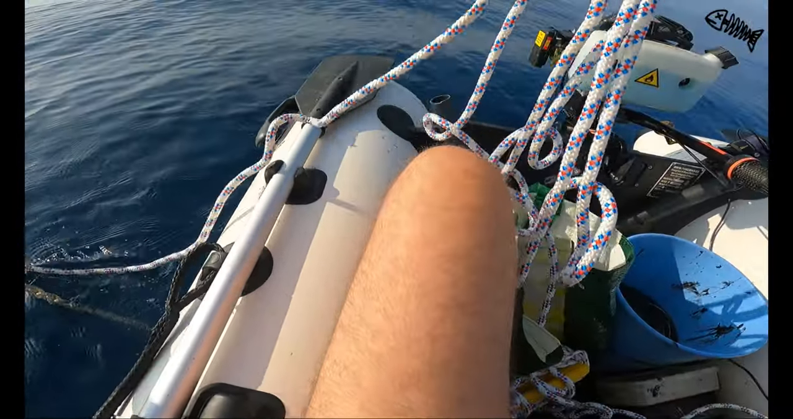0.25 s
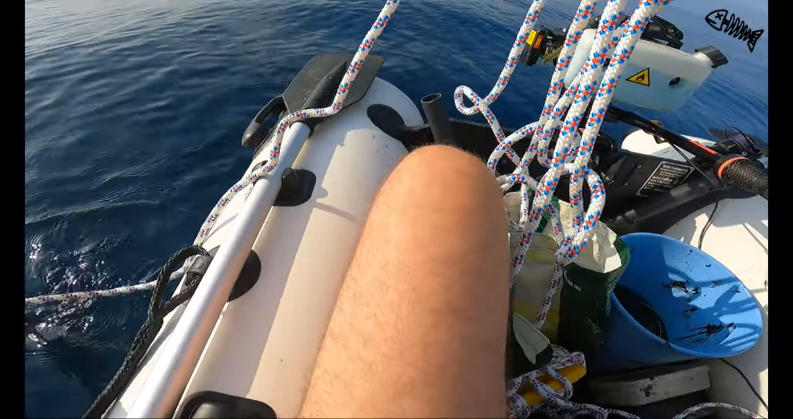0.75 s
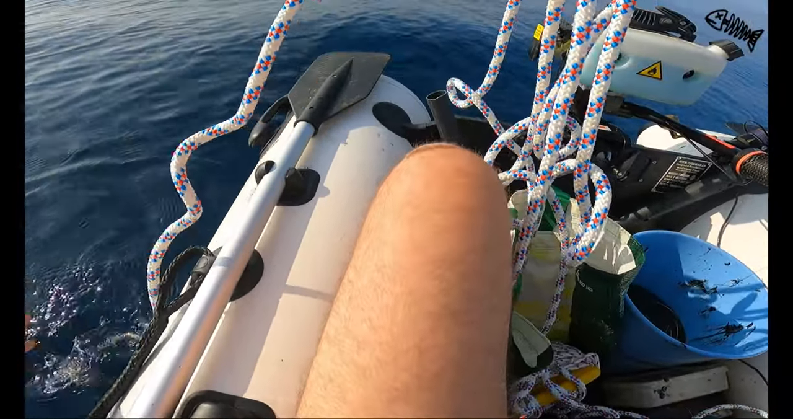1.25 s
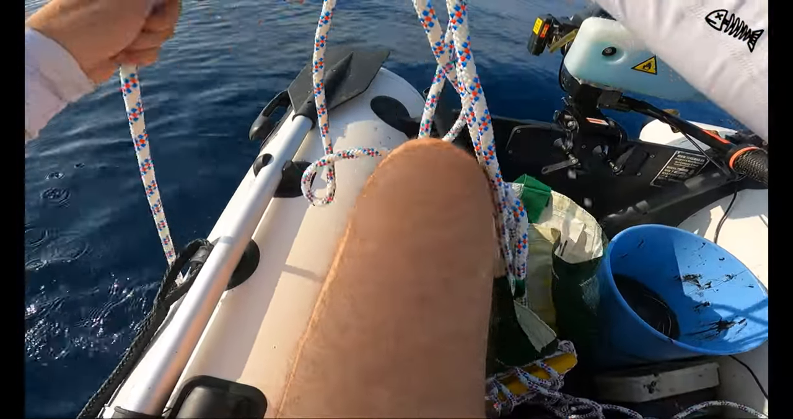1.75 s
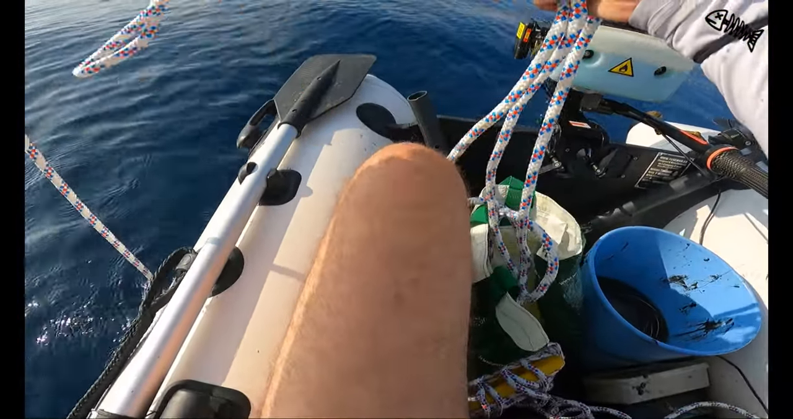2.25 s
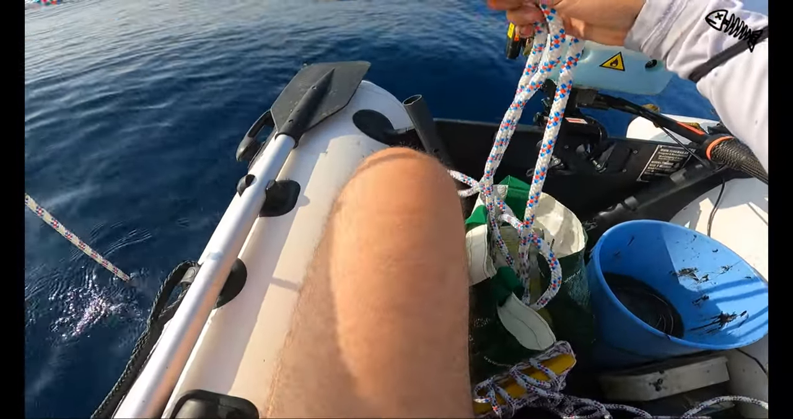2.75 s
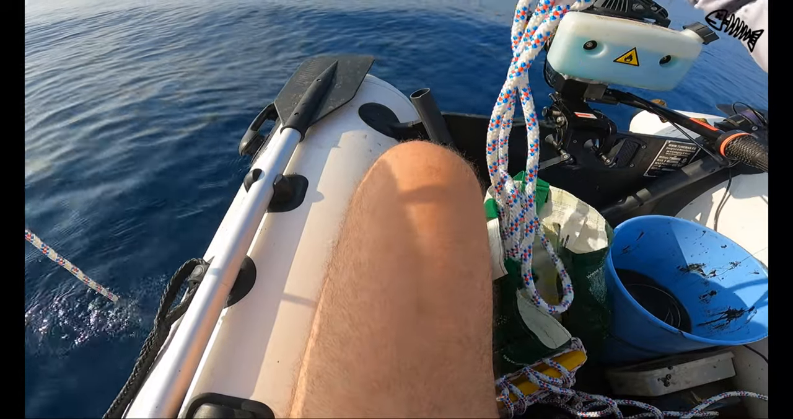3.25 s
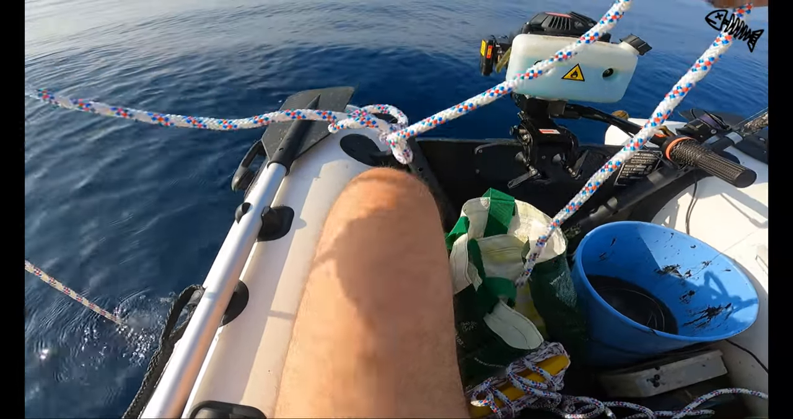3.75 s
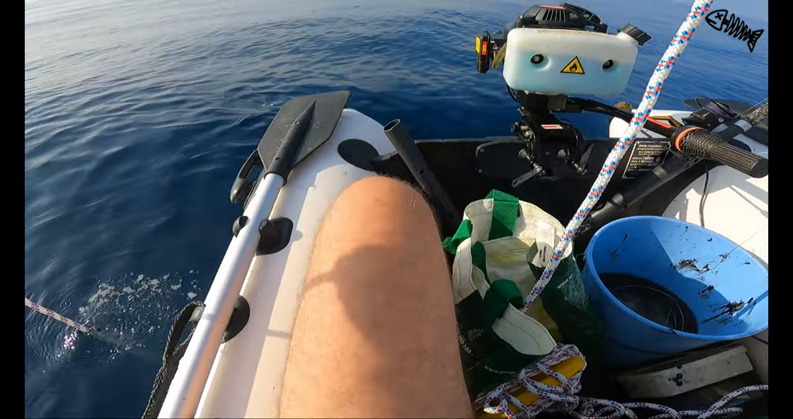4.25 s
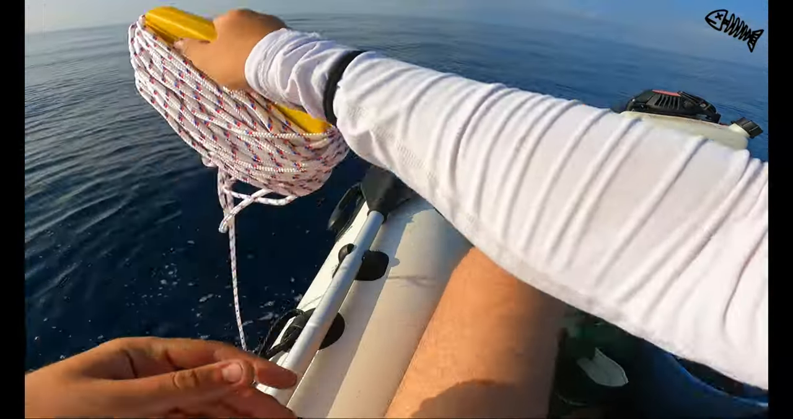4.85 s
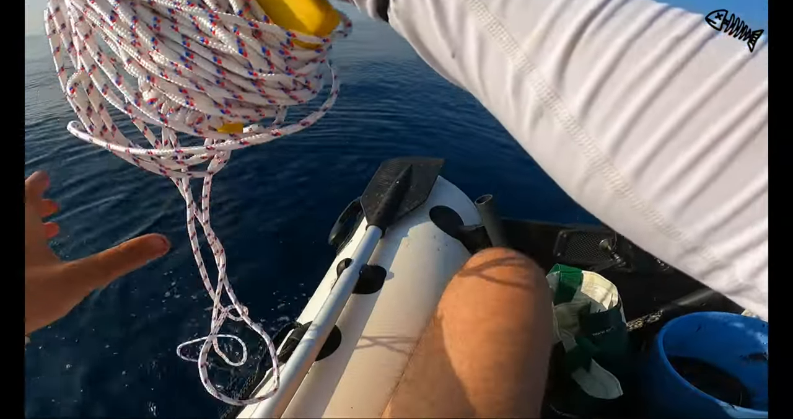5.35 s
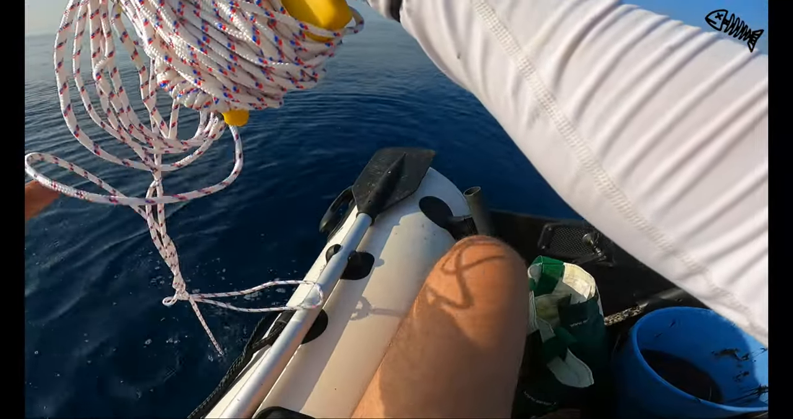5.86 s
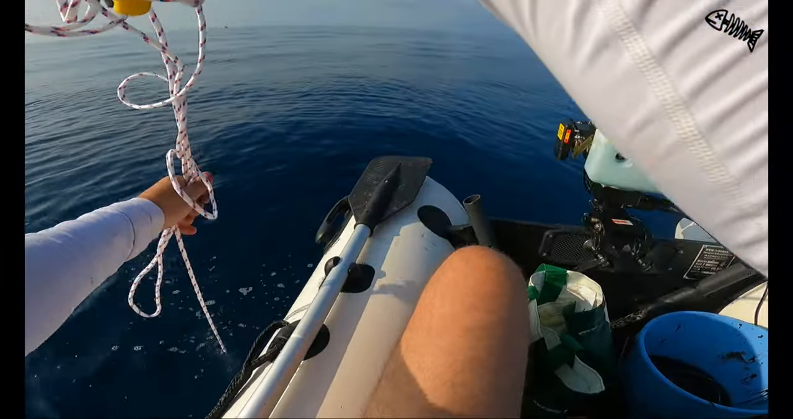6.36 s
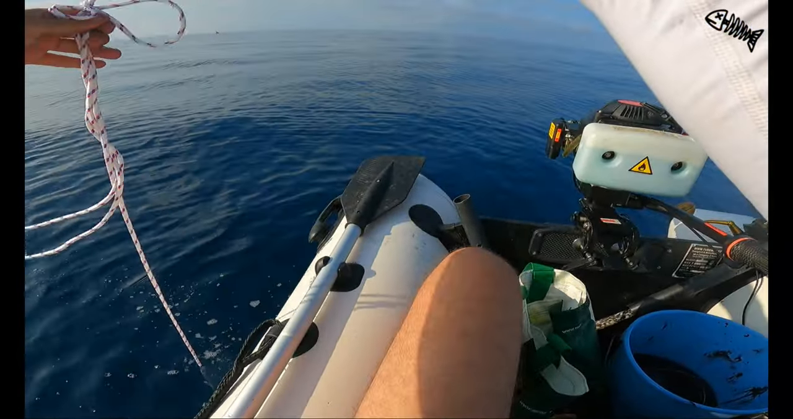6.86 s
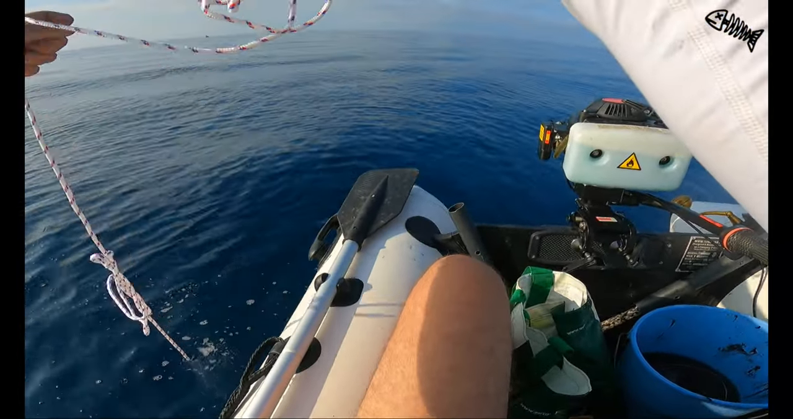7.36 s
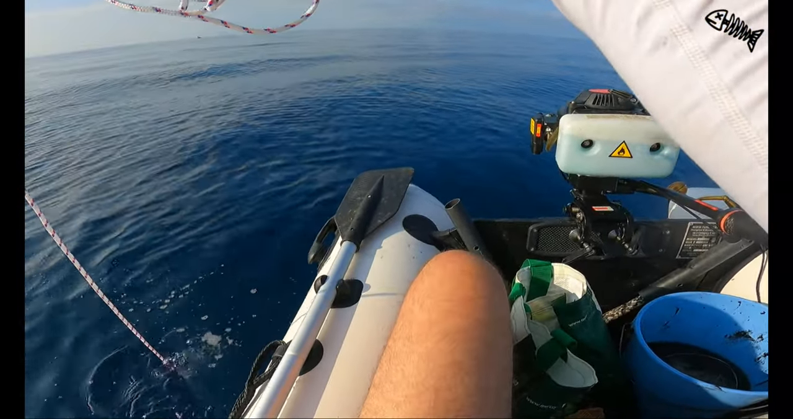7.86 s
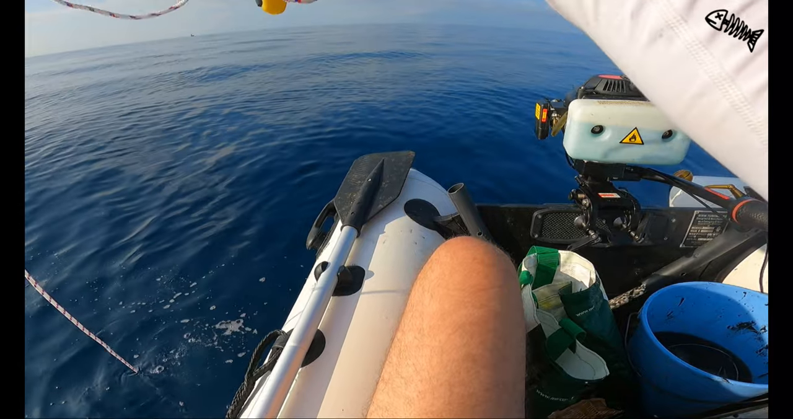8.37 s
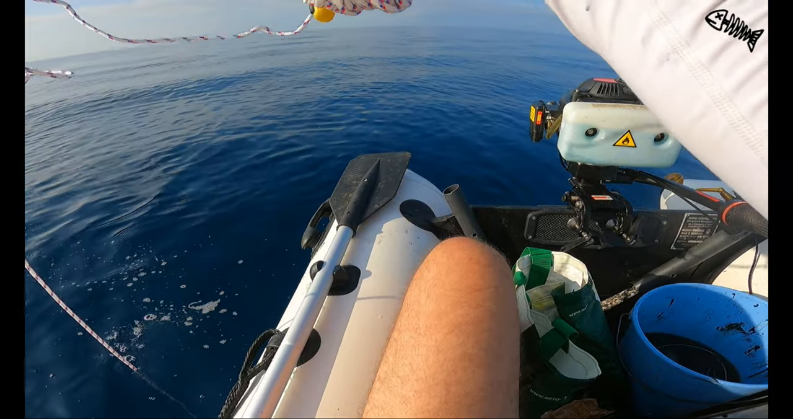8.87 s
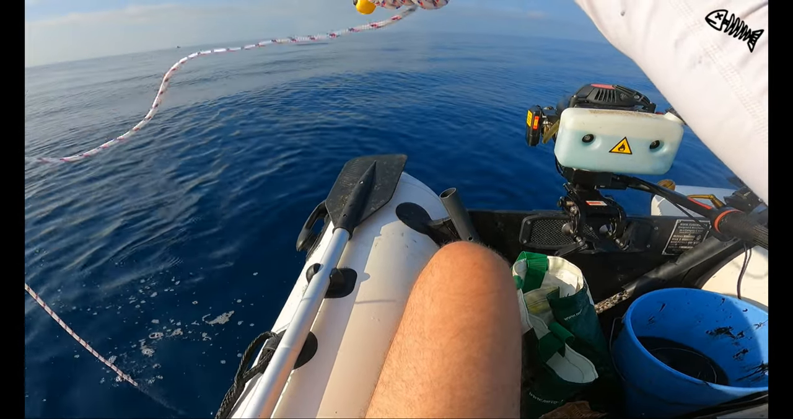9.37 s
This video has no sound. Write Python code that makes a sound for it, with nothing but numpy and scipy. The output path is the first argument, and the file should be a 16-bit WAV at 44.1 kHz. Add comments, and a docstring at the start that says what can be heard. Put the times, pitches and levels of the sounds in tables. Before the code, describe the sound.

Close by, a rope is paid out from a small inflatable boat. It plops, drips and splashes into the water, then rubs the rubber side with a short, jerky groan. The braid rasps through hands and scuffs against the boat. Two more clusters of small splashes follow while the sliding turns to a thinner hiss. Calm water washes faintly along the hull, and light gusts thump on the microphone in the open air.

```python
"""Calm water washes along a small inflatable boat in a light wind as an anchor rope is paid out.
Its loops scuff the side and slap the sea: impacts splat, trapped air rings in plops, and drips and
spray tick and leave small bubbles. Friction makes the braid hiss and crackle in the hands; pulled taut,
it sticks and slips on the air tube with a groan. Gusts puff on the microphone."""
import sys
import numpy as np
from scipy import signal
from scipy.fft import rfft, irfft, next_fast_len
from scipy.io import wavfile
from scipy.ndimage import uniform_filter1d, map_coordinates

SR = 44100
rng = np.random.default_rng(int(sys.argv[2]) if len(sys.argv) > 2 else 0)


def inscribe(sig):
    """Save sig as 16-bit PCM at rate SR to the path in sys.argv[1].

    A 1-D sig is mono; a 2-D sig holds one channel per row.
    Samples are clipped to [-1, 1] before scaling.
    """
    pcm = np.round(np.clip(np.atleast_2d(sig).T, -1, 1) * 32767)
    wavfile.write(sys.argv[1], SR, pcm.astype(np.int16))


N = 423801


def amp(db):
    """Amplitude ratio of a level in decibels."""
    return 10 ** (np.asarray(db) / 20)


def unit(x):
    """Normalisation to rms 1."""
    return x / np.sqrt(np.mean(x ** 2) + 1e-20)


def along(points, hz):
    """Interpolation of (frequency_hz, value) points on a logarithmic frequency axis."""
    frequencies, values = np.transpose(points)
    return np.interp(np.log(hz + 1), np.log(frequencies + 1), values)


def wobble(rate_hz):
    """Slow random modulation: a spline through rate_hz Gaussian knots a second."""
    knots = rng.standard_normal(int(N * rate_hz / SR) + 4)
    return map_coordinates(knots, [np.arange(N) * rate_hz / SR])


def swell(centre_s, width_s):
    """A Gaussian envelope, width_s wide at 1/e of its peak."""
    return np.exp(-np.minimum((2 * (np.arange(N) / SR - centre_s) / width_s) ** 2, 50))


def held(t, length_s, attack_s, release_t60_s):
    """An envelope with linear attack, hold until length_s and exponential decay."""
    return np.clip(t / attack_s, 0, 1) * amp(-60 * np.maximum(t - length_s, 0) / release_t60_s)


def filtered(x, response):
    """Linear filtering: the spectrum of x times a frequency response."""
    size = x.shape[-1]
    padded = next_fast_len(size + SR // 5)
    return irfft(rfft(x, padded) * response(np.fft.rfftfreq(padded, 1 / SR)), padded)[..., :size]


def rush(spectrum, side_db):
    """Coloured stereo noise of rms 1; the side level sets its width."""
    mid, side = filtered(rng.standard_normal((2, N)), lambda hz: amp(along(spectrum, hz)))
    return unit(np.array([mid + amp(side_db) * side, mid - amp(side_db) * side]))


def band(size, centre_hz, order):
    """Band-pass noise of rms 1; a higher order is narrower."""
    white = rng.standard_normal(size)
    return unit(filtered(white, lambda hz: (2 * hz * centre_hz / (hz ** 2 + centre_hz ** 2)) ** order))


def add(track, start_s, sound):
    """Superposition of a sound on a track."""
    i = int(np.clip(round(start_s * SR), 0, N - 1))
    track[..., i:i + sound.shape[-1]] += sound[..., :N - i]


def wash(level_db=-48.5, fade_db=-6):
    """Amplitude-modulated noise: small waves wash unevenly along the hull and slowly settle."""
    # water on the hull: frequency_hz, density_db
    spectrum = [(60, -34), (170, 0), (300, -1.5), (800, -21), (1400, -18), (3500, -43.5)]
    level = amp(level_db + fade_db * np.arange(N) / N)
    ripple = amp(3.2 * wobble(8) + 3 * wobble(36))
    return level * unit(rush(spectrum, side_db=-8.0) * ripple)


def wind(breeze_db=-44, gust_gain_db=8.5, rumble_db=-19, rumble_t60_s=0.24):
    """Turbulent pressure buffets the microphone; single pulses of air trail off in a rumble."""
    # gusts: centre_s, width_s, relative_db
    gusts = [(3.28, 0.48, -38), (4.562, 0.19, -35.5), (6.462, 0.42, -40.5), (7.335, 0.15, -38.5),
             (7.978, 0.66, -37.5), (8.502, 0.15, -41)]
    # turbulence: frequency_hz, density_db
    spectrum = [(10, -15), (30, 8.5), (60, -2), (120, -10), (500, -56.5)]
    # pressure pulses of gusts and bumps: centre_s, peak_db, centre_hz
    puffs = [(2.632, -20, 105), (3.23, -17, 68.8), (4.114, -19, 67), (6.06, -15.5, 86), (6.512, -6, 86),
             (7.948, -9.5, 56), (8.521, -7, 138)]
    strength = amp(breeze_db) + sum(amp(db + gust_gain_db) * swell(s, width) for s, width, db in gusts)
    out = strength * unit(rush(spectrum, side_db=-11) * amp(3.5 * wobble(14)))
    t = np.arange(SR // 2) / SR
    for s, db, hz in puffs:
        u = np.clip(np.pi * np.sqrt(2) * hz * (np.arange(N) / SR - s), -20, 20)
        out += amp(db) * (1 - 2 * np.tanh(u) ** 2) / np.cosh(u)  # a push between two sucks
        rumble = band(len(t), hz / 2, order=3) * held(t, 1 / hz, 1 / hz, rumble_t60_s)
        add(out, s, amp(db + rumble_db) * rumble)
    return out


def scuffs(catches_per_s=170, catch_s=0.0075, attack_s=0.0031, release_t60_s=0.067,
           tap_s=0.0039, tap_db=-39.5):
    """Friction on fabric: the rope's strands catch and let go in a quick, uneven crackle."""
    # coils scrape the boat and the hands: start_s, length_s, level_db
    scrapes = [(0.066, 0.0047, -30), (3.214, 0.067, -37.5), (3.271, 0.0087, -29.5), (3.355, 0.057, -29.5),
               (3.449, 0.052, -38), (3.532, 0.1, -31.5), (4.694, 0.13, -42.5), (4.865, 0.0094, -28),
               (6.354, 0.057, -44)]
    # soft knocks against the hull, each a very short scuff: start_s
    taps = [2.091, 2.385, 2.508, 2.67, 2.829, 2.96, 5.794, 5.85]
    # scraped fabric: frequency_hz, density_db
    spectrum = [(60, 7), (200, 18), (1300, 3.5), (2600, -5), (12000, -22)]
    t = np.arange(N) / SR
    touches = list(scrapes) + [(s, tap_s, tap_db) for s in taps]
    stroke = sum(amp(db) * held(t - s, length, attack_s, release_t60_s) for s, length, db in touches)
    count = int(catches_per_s * N / SR)
    onsets = ((np.arange(count) + rng.random(count)) * N / count).astype(int)
    catches = np.bincount(onsets, amp(3.5 * rng.standard_normal(count)), N)[:N]
    crackle = signal.lfilter([1], [1, -np.exp(-1 / (catch_s * SR))], catches)  # each catch decays
    return stroke * unit(rush(spectrum, side_db=-15.5) * crackle)


def bubble(t, first_hz, last_hz, t60_s):
    """A damped oscillator: trapped air rings up within a cycle and glides as size and depth change."""
    hz = last_hz + (first_hz - last_hz) * np.exp(-3.5 * t / t60_s)
    phase = 2 * np.pi * np.cumsum(hz, axis=-1) / SR
    return np.sin(phase) * (1 - np.exp(-t * first_hz)) * amp(-60 * t / t60_s)


def splat(centre_hz, spit_db=-12, tail_db=-18):
    """An impact transient of peak 1: a snap of a few cycles and a spit of noise around its pitch."""
    t = np.arange(SR // 20) / SR
    decay = amp(-60 * t / .011) + amp(tail_db - 60 * t / .05)
    snap = bubble(t, centre_hz, centre_hz, t60_s=8 / centre_hz)
    spit = band(len(t), centre_hz, order=1) + amp(0.5) * band((2, len(t)), centre_hz, order=1)
    hit = snap / np.abs(snap).max() + amp(spit_db) * spit * decay
    return hit / np.abs(hit).max()


def splats():
    """Impact sound: rope and heavy drops hit the surface without trapping air."""
    # impacts on the water, with a sharp crackle of the handled rope at 4.87 s: start_s, peak_db, centre_hz
    impacts = [(0.073, -22.5, 1060), (0.167, -25, 6200), (0.594, -3, 4760), (.849, -18.5, 6850),
               (1.077, -21, 2130), (1.112, -24, 3500), (1.183, -20, 5000), (1.349, -9.5, 1650),
               (1.38, -15, 1880), (1.409, -7.5, 1850), (1.583, -10.5, 3930), (1.616, -9.5, 1950),
               (3.603, -7, 1794), (4.151, -22.5, 2050), (4.87, -19.5, 1370), (4.977, -10.5, 1190),
               (5.014, -11, 2140), (5.184, -17.5, 2160), (5.222, -18.5, 2580), (5.576, -9, 2950),
               (5.622, -13.5, 3100), (7.481, -15.5, 2820), (7.71, -13, 8700), (7.805, -14, 1300),
               (7.831, -12, 2012), (7.899, -12.5, 1580), (7.91, -9.5, 1420), (7.916, -5.5, 6200),
               (8.133, -30.5, 2240)]
    out = np.zeros((2, N))
    for s, db, centre_hz in impacts:
        add(out, s, amp(db) * splat(centre_hz))
    return out


def pocket(t, hz, t60_s, steady_hz, glide_exponent=0.37, lowest_ratio=0.544):
    """Resonance of one air pocket, peak 1: a pitch below steady_hz sinks, one above it rises."""
    last_hz = hz * max((hz / steady_hz) ** glide_exponent, lowest_ratio)
    ring = bubble(t, hz, last_hz, t60_s)
    return ring / np.abs(ring).max()


def plops(steady_hz=1210, slap_db=-10, slap_hz=1295, churn_db=-17, churn_life=8, churn_cycles=65):
    """Bubble resonance: a slap traps air that rings and rebounds lower and longer in churning water."""
    # air pockets that the rope drags under: start_s, peak_db, pitch_hz, t60_s
    pockets = [(.294, -1.5, 311, 0.029), (0.719, -8, 269, 0.03), (1.266, -20, 1016, 0.038),
               (1.415, -7.5, 383, 0.0088), (1.445, -12, 490, 0.047), (1.505, -20, 1040, 0.02),
               (4.947, -5.5, 564, 0.02), (4.984, -13.5, 874, 0.012), (5.002, -11.5, 1510, 0.029),
               (5.07, -18.5, 410, 0.022), (5.596, -10, 520, 0.0057), (7.479, -11, 880, 0.0073),
               (7.747, -25, 530, 0.0098), (7.918, -15, 448, .014)]
    rebound_s, pitch_ratio, t60_ratio = 0.016, .77, 1.86  # first delay; each ring over the one before
    out, t = np.zeros((2, N)), np.arange(SR // 4) / SR
    for s, db, hz, t60 in pockets:
        churn_t60 = min(churn_life * t60, churn_cycles / hz)
        churn = band(len(t), 0.8 * hz, order=3) * amp(churn_db - 60 * t / churn_t60)
        add(out, s, amp(db + slap_db) * splat(slap_hz))
        add(out, s, amp(db) * churn)
        rebound_db = -22.5 + 6.5 * np.log2(steady_hz / hz)  # low pockets lose less at each rebound
        for k in range(3):
            ring = pocket(t, hz * pitch_ratio ** k, t60 * t60_ratio ** k, steady_hz)
            add(out, s + rebound_s * k * (k + 1) / 2, amp(db + k * rebound_db) * ring)
    return out


def patchy(x, depth_db):
    """Time-varying filtering: random resonances come and go."""
    spectrogram = signal.stft(x, nperseg=512)[2]
    field = uniform_filter1d(rng.standard_normal(spectrogram.shape[1:]), size=6, axis=0)  # in frequency
    field = uniform_filter1d(field, size=45, axis=1)  # in time
    return signal.istft(spectrogram * amp(depth_db * unit(field)), nperseg=512)[1][:, :N]


def slide(creep_db=-60, resting_db=-72, rest_s=7.9, bright_from_s=6.7, side_db=-7):
    """Sliding friction: braid hisses through the hands, grainy from its strands, coloured by the grip."""
    # pulls on the rope: start_s, end_s, first_db, last_db, hiss_over_rasp_db
    pulls = [(0.386, 0.428, -40, -40.5, -9), (1.54, 2.01, -47.5, -36, -2.5),
             (1.806, 2.85, -41.5, -52, -0.5), (3.055, 3.866, -46, -47.5, -2), (4.058, 4.498, -51, -50, 0),
             (4.654, 5.6, -57, -61, 3), (5.654, 6.366, -61.5, -57, 9), (6.364, 6.715, -44.5, -46.5, 0),
             (6.7, 7.249, -54, -49, 4), (7.302, 7.886, -53, -55, 5), (8.317, 8.72, -54, -71, 0),
             (8.637, 9.626, -54.5, -52, -5)]
    # fuller rasp of the sliding rope: frequency_hz, density_db
    full_rasp = [(400, -9.5), (800, -8), (1200, 2.5), (1800, 4.5), (2600, 1), (3400, 4), (5000, 6),
                 (12000, -42.5)]
    # then a thinner, brighter rasp: frequency_hz, density_db
    bright_rasp = [(700, -32), (2500, -8.5), (3200, -9), (4800, -0.5), (12000, -29.5)]
    # fine hiss of the braid: frequency_hz, density_db
    fine_hiss = [(3000, -29.5), (5000, -5), (7000, 1), (8400, -5), (10800, -6), (12200, -4.5),
                 (16000, -11.5)]
    # hollow resonances of braid drawn over an edge: centre_s, width_s, level_db, pitch_hz
    edge_rubs = [(2.457, 1, -59.5, 1860), (2.604, 0.51, -52, 3580), (4.146, .16, -51.5, 2190),
                 (4.397, 0.19, -52, 2520)]
    t = np.arange(N) / SR
    rasp_gain = hiss_gain = amp(np.where(t < rest_s, creep_db, resting_db))  # floor between pulls
    for start, end, first_db, last_db, hiss_db in pulls:
        pull = amp(np.interp(t, [start, end], [first_db, last_db]))
        pull *= held(t - start, end - start, attack_s=.025, release_t60_s=.11)
        rasp_gain = np.maximum(rasp_gain, pull)
        hiss_gain = np.maximum(hiss_gain, amp(hiss_db) * pull)
    strands_db = 1.5 * wobble(30) + 1.7 * wobble(400)
    rasp = np.where(t < bright_from_s, rush(full_rasp, side_db), rush(bright_rasp, side_db))
    hiss = rush(fine_hiss, side_db)
    squeaks = sum(amp(db) * swell(s, width) * band(N, hz, order=100) for s, width, db, hz in edge_rubs)
    return amp(strands_db) * patchy(rasp_gain * rasp + hiss_gain * hiss + squeaks, depth_db=2.2)


def drips(typical_hz=804, doubling_s=0.1, tick_db=1.5, tick_hz=2530):
    """Air entrainment: each drop ticks and leaves a bubble whose resonance rises as it surfaces."""
    # drops from the wet rope: start_s, level_db
    drops = [(.624, -34), (0.652, -35), (0.796, -36), (.932, -35), (.961, -29), (1.16, -38.5), (1.204, -39)]
    out, t = np.zeros((2, N)), np.arange(SR // 10) / SR
    phase = 2 * np.pi * np.cumsum(typical_hz * (1 + (t / doubling_s) ** 3)) / SR
    for s, db in drops:
        detune = 2 ** (rng.standard_normal() / 10)
        t60_s = 4 * amp(db)  # louder drops ring longer
        ring = np.sin(phase * detune) * amp(-60 * t / t60_s)
        flutter = 1 + .5 * wobble(220)[:len(t)]
        add(out, s, amp(db) * ring * flutter)
        add(out, s, amp(db + tick_db) * splat(tick_hz))
    return out


def crackles(density=300, pitch_spread=.44, size_spread_db=6, rise=1.15, ring_cycles=17, fizz_db=-14):
    """Random transients: ticks and short, rising rings over a fizz; in spray, drops, bubbles and foam."""
    # bursts of fine crackle: spray from the water, and the handled rope crackling at 4.8 s:
    # centre_s, width_s, level_db, typical_hz
    bursts = [(0.821, .16, -48, 3950), (1.259, 0.041, -32.5, 1907), (1.42, 0.071, -24, 1567),
              (1.538, 0.033, -28, 1460), (1.612, 0.096, -31.5, 2420), (4.779, 0.17, -46.5, 4500),
              (5.02, 0.1, -26, 2060), (5.205, .085, -36, 2360), (5.389, .1, -44, 3350),
              (5.535, 0.022, -40, 1810), (5.593, 0.036, -33, 2290), (7.836, 0.17, -39.5, 2190),
              (8.006, .11, -44.5, 570)]
    out, t = np.zeros((2, N)), np.arange(SR // 20) / SR
    for s, width, db, centre_hz in bursts:
        grains = np.zeros((2, N))
        count = int(density * np.sqrt(width))
        ticks = band(count * len(t), centre_hz, order=2).reshape(count, -1) * amp(-11 - 60 * t / .005)
        for k, (pitch, life, size, pan) in enumerate(np.clip(rng.standard_normal((count, 4)), -2, 2)):
            hz = min(centre_hz * np.exp(pitch_spread * pitch), SR / 4)
            ring = bubble(t, hz, rise * hz, t60_s=ring_cycles * np.exp(life / 2) / hz)
            onset_s = s + width * (2 * (k + rng.random()) / count - 1)
            stereo_gain = amp(size_spread_db * size + 2 * pan * np.array([[1], [-1]]))
            add(grains, onset_s, stereo_gain * (ring + ticks[k]))
        grains = unit(grains) * np.sqrt(2 * width * SR / N)  # rms near 1 during the burst
        fizz = band(int(2 * width * SR), centre_hz, order=2)
        add(grains, s - width, amp(fizz_db) * fizz)
        out += amp(db) * swell(s, width) * grains
    return out


def groan(octave_db=-10, rub_db=-4, sag_hz_per_s=593, fade_db_per_s=30):
    """Stick-slip friction: the taut rope drives the rubber tube, which passes only the lowest partials."""
    # jerks of the rope on the tube: start_s, length_s, level_db, slip_hz
    jerks = [(1.576, 0.033, -26.5, 376), (1.655, 0.0091, -22.5, 316), (1.705, 0.016, -25.5, 358),
             (1.75, 0.066, -19.5, 386.6), (1.826, 0.012, -16, 277), (1.877, 0.0099, -19, 275),
             (1.898, 0.028, -14, 284), (1.945, 0.048, -24, 271.4)]
    # rubbed tube: frequency_hz, density_db
    spectrum = [(70, -34.0), (150, 6.0), (450, 2.0), (780, -10), (1000, -25.0), (2500, -32.5)]
    out, t = np.zeros((2, N)), np.arange(SR // 4) / SR
    rub = rush(spectrum, side_db=-17.5)
    uneven = 1 + 0.0707 * wobble(130)
    for s, length, db, slip_hz in jerks:
        span = round(s * SR) + np.arange(len(t))
        hz = (slip_hz - sag_hz_per_s * np.minimum(t, length)) * uneven[span]  # the tension eases
        phase = 2 * np.pi * np.cumsum(hz) / SR
        tone = unit(np.sin(phase) + amp(octave_db) * np.sin(2 * phase))
        level = amp(db - fade_db_per_s * t) * held(t, length, attack_s=0.0023, release_t60_s=0.16)
        add(out, s, level * (tone + amp(rub_db) * rub[:, span]))
    return out


def scene():
    """Free-field superposition: every source is close and dry in the open air."""
    return plops() + splats() + drips() + crackles() + groan() + slide() + scuffs() + wind() + wash()


def record(dry, rolloff_hz=11500, limit_hz=15800):
    """Microphone response: the left port is brighter, the right takes more bass, the top rolls off."""
    # imbalance of the ports: frequency_hz, left_minus_right_db
    balance = [(60, -5.5), (250, -2), (1000, 1.05), (9000, 2), (12500, 6)]
    split = np.array([[.5], [-.5]])
    ports = filtered(dry, lambda hz: amp(along(balance, hz) * split) / (1 + (hz / rolloff_hz) ** 6))
    return filtered(ports, lambda hz: hz < limit_hz)


dry = scene()
out = record(dry)
inscribe(out)
```